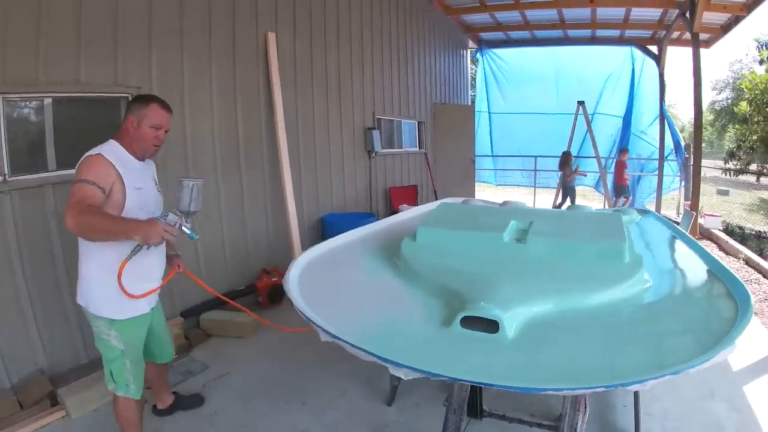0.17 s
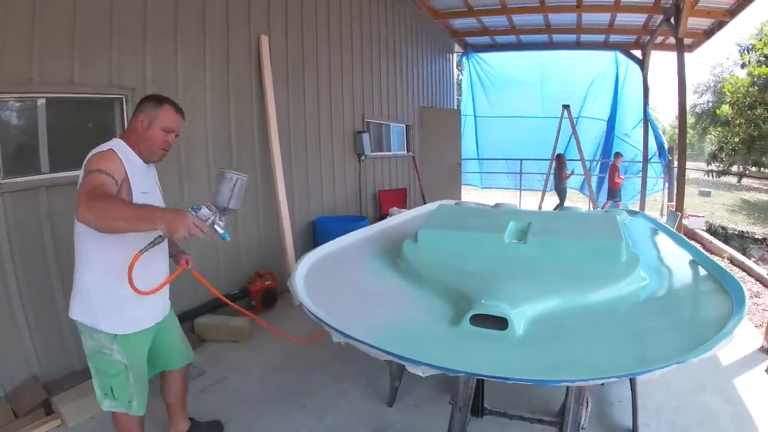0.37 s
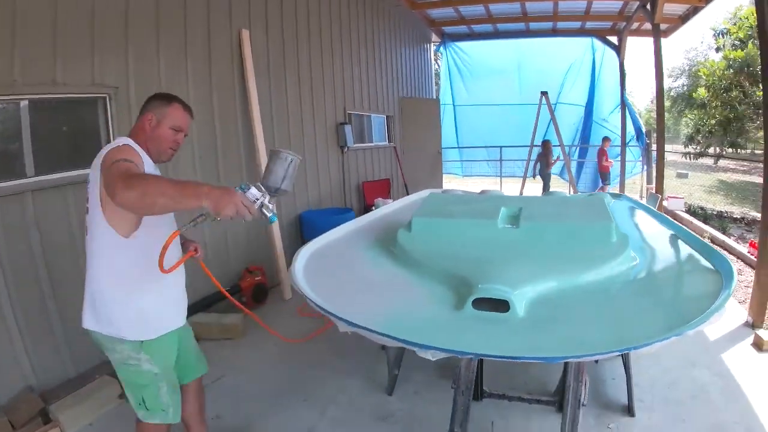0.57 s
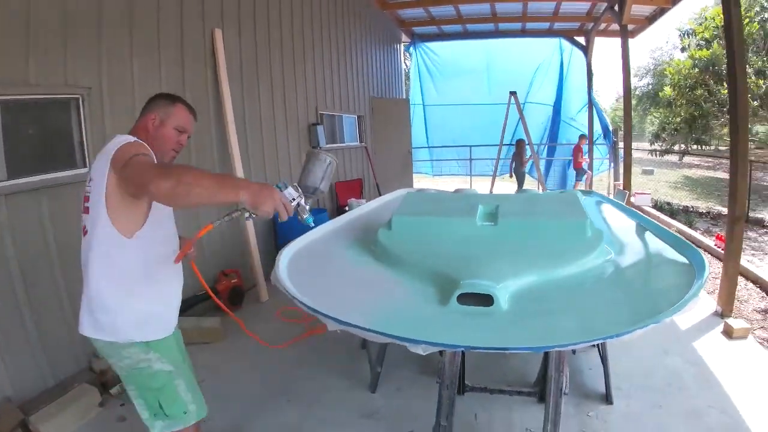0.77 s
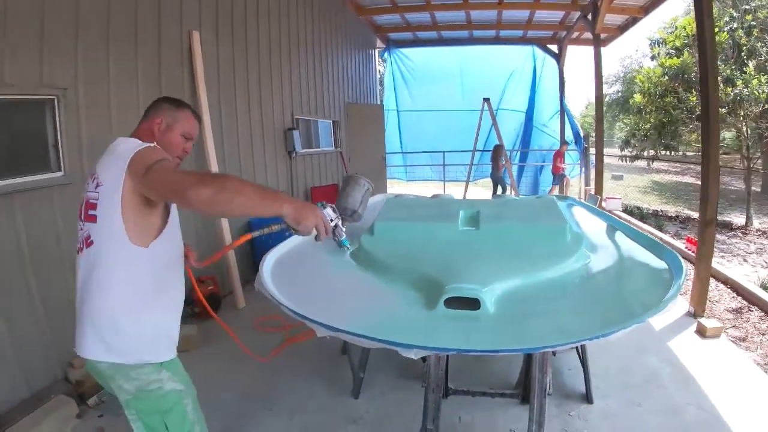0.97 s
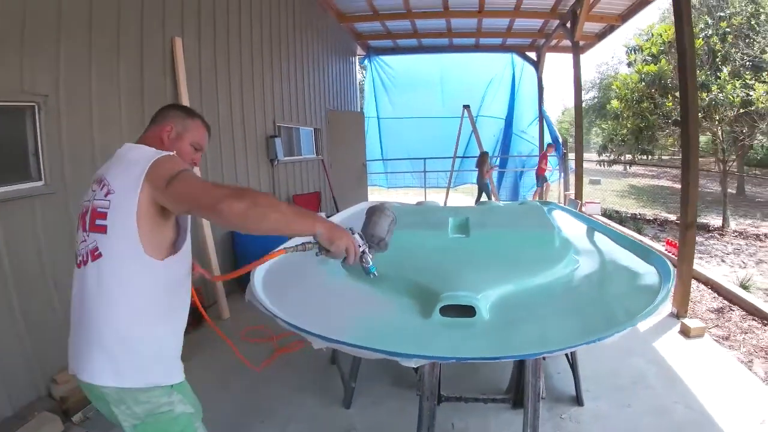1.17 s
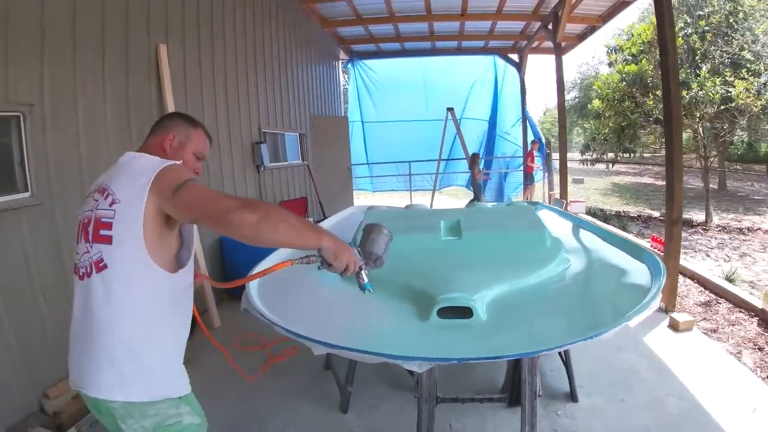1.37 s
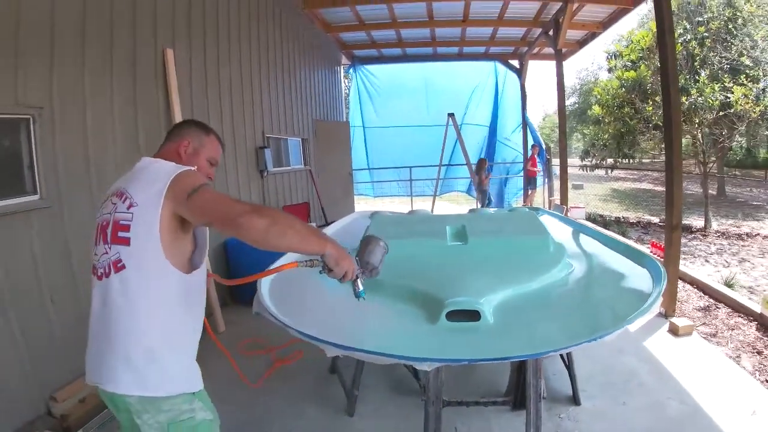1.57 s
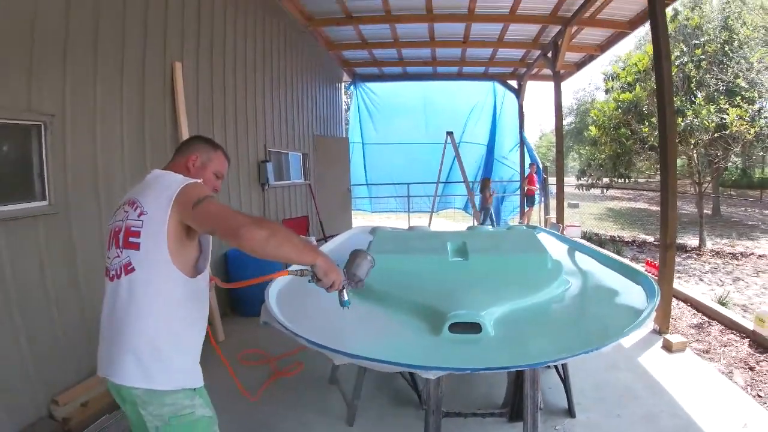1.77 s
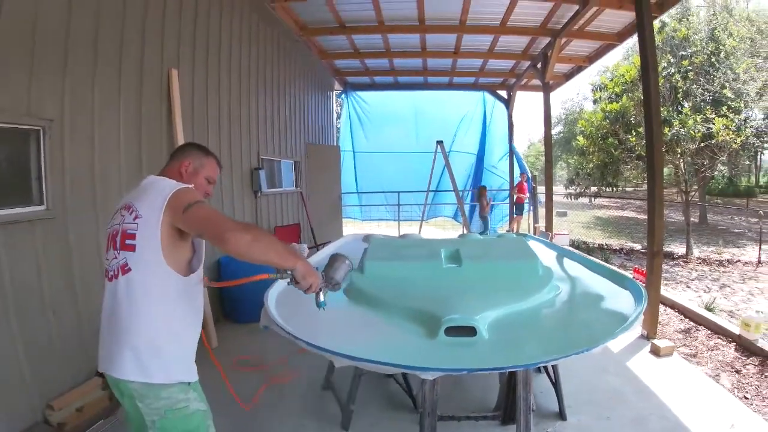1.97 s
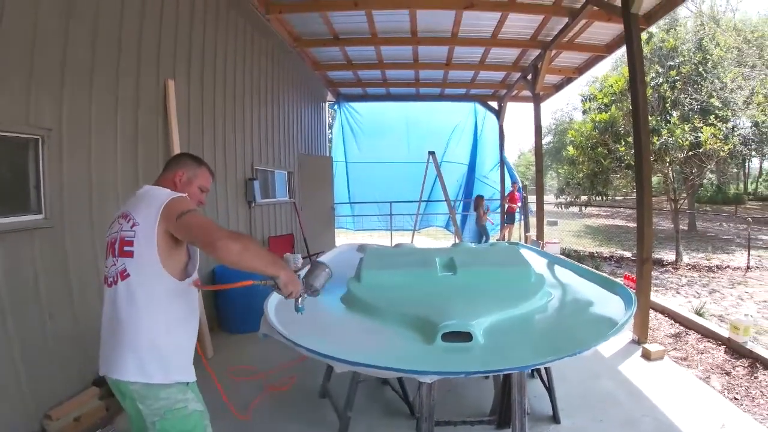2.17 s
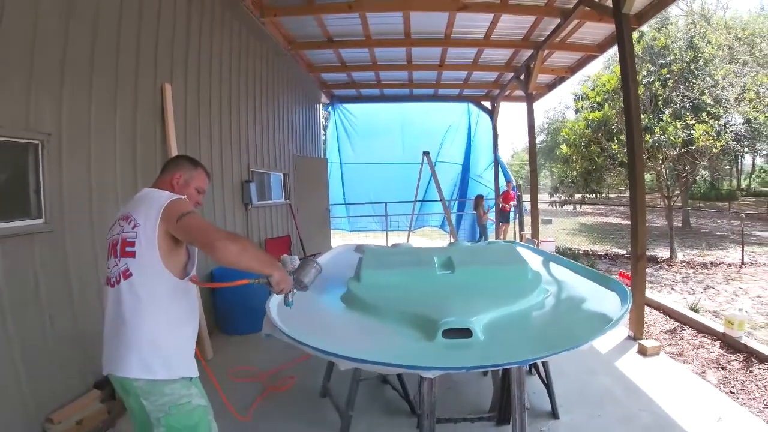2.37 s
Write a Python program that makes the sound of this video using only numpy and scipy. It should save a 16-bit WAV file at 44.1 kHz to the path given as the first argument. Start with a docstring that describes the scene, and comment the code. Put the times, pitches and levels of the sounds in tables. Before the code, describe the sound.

A compressed-air spray gun bursts into a loud steady hiss after scuffing steps and wind buffeting

```python
"""A compressed-air spray gun hisses: jet noise and whistling nozzle bands, strongest while hose pressure is full.
A boat deck and a wall reflect the jet as moving echoes, and the deck drums faintly under it.
Before that a painter shuffles over the gritty concrete of an open carport: scuffs, hose clinks, light taps.
Gusts of low noise buffet the microphone, and the hardest ones make it sputter.
A low outdoor rumble and a faint hiss lie behind."""
import sys
import numpy as np
from scipy import signal
from scipy.fft import rfft, irfft, next_fast_len
from scipy.io import wavfile
from scipy.ndimage import uniform_filter1d, map_coordinates

SR = 44100
rng = np.random.default_rng(int(sys.argv[2]) if len(sys.argv) > 2 else 0)


def file_out(sig):
    """Save sig as 16-bit WAV at sys.argv[1]."""
    # one column per channel
    cols = np.atleast_2d(sig).T
    # limit, then scale
    lim = np.clip(cols, -1, 1)
    pcm = np.round(lim * 32767).astype(np.int16)
    wavfile.write(sys.argv[1], SR, pcm)


N = 106281


def amp(db):
    """Decibels to gain."""
    return 10 ** (np.asarray(db) / 20)


def unit(x):
    """Scale to rms 1."""
    return x / np.sqrt(np.mean(x ** 2) + 1e-20)


def clock():
    """Time of each sample in seconds."""
    return np.arange(N) / SR


def curve(rows):
    """(s, value) points joined by lines."""
    return np.interp(clock(), *np.transpose(rows))


def along(points, hz):
    """(Hz, value) points joined on a log frequency axis."""
    point_hz, value = np.transpose(points)
    return np.interp(np.log(hz + 1), np.log(point_hz + 1), value)


def filtered(x, response):
    """x times a response of frequency, zero-padded."""
    size = next_fast_len(N + SR // 2)
    spectrum = rfft(x, size) * response(np.fft.rfftfreq(size, 1 / SR))
    return irfft(spectrum, size)[..., :N]


def noise(spectrum):
    """Coloured noise of rms 1."""
    return unit(filtered(rng.standard_normal(N), lambda hz: amp(along(spectrum, hz))))


def even(x, size):
    """Level a noise over size samples, so that mainly its envelope sets the strength."""
    power = uniform_filter1d(uniform_filter1d(x ** 2, size), size)
    return unit(x / np.sqrt(np.abs(power) + 0.068))


def whistle(centre_hz, width_hz):
    """A narrow band of air noise, rms 1."""
    band = lambda hz: 1 / (1 + (2 * (hz - centre_hz) / width_hz) ** 2)
    return unit(filtered(rng.standard_normal(N), band))


def wobble(rate_hz):
    """A smooth random curve, rate_hz knots a second."""
    return map_coordinates(rng.standard_normal(N // 10), [clock() * rate_hz], mode="wrap")


def bursts(rows):
    """A rounded swell for each (start s, length s, dB) row."""
    t = clock()
    return sum(amp(db) * np.sin(np.pi * np.clip((t - s) / length_s, 0, 1)) for s, length_s, db in rows)


YARD_DB = -49
# Outdoor rumble spectrum. Each row: frequency in Hz, relative level in dB.
YARD_SPECTRUM = [(40, -5), (180, 0.5), (300, -8), (450, -10), (800, -9), (1100, -19.5), (1600, -22),
                 (4000, -49)]
# Faint hiss spectrum. Each row: frequency in Hz, relative level in dB.
AIR_SPECTRUM = [(200, -20), (700, -7), (1200, -1), (2000, 1), (4000, 1), (6500, -1), (8900, -0.5),
                (9800, -10), (11200, -19.5), (13000, -24), (15600, -36)]
# Hiss level. Each row: time in seconds, level in dB.
AIR_LEVEL = [(0, -52.5), (.22, -52.5), (.45, -51), (.76, -51), (.88, -56), (1.2, -58)]


def background():
    """A steady low outdoor rumble under a faint hiss that sinks before the spray starts."""
    return amp(YARD_DB) * noise(YARD_SPECTRUM) + amp(curve(AIR_LEVEL)) * noise(AIR_SPECTRUM)


# Gust strength. Each row: time in seconds, level in dB.
GUST_LEVEL = [(0.0, -43.5), (0.05, -62), (0.11, -37.5), (0.17, -49.5), (0.33, -32.5), (0.35, -42),
              (0.42, -30), (0.55, -35.5), (0.6, -26), (0.75, -45), (0.78, -31.5), (0.82, -40.5),
              (1.01, -23.5), (1.29, -47.5), (1.72, -49), (1.97, -23.5), (1.99, -44), (2.03, -22.5),
              (2.07, -41), (2.11, -22.5), (2.24, -24.5), (2.28, -15), (2.32, -21.5), (2.41, -39)]
# Gust spectrum. Each row: frequency in Hz, relative level in dB.
RUMBLE_SPECTRUM = [(10, -10), (25, 2), (48, 0.5), (80, -7.5), (125, -13), (190, -27.5), (350, -49),
                   (800, -72), (2000, -100)]
# Eddies that thump the microphone. Each row: start in seconds, length in seconds, level in dB.
THUMPS = [(.405, 0.028, -27.5), (.57, 0.065, -28.5), (.955, 0.014, -30.5), (.985, 0.053, -32.5),
          (2.18, 0.034, -22.5), (2.245, 0.064, -18.5), (2.3, 0.04, -28)]
# Thump spectrum. Each row: frequency in Hz, relative level in dB.
THUMP_SPECTRUM = [(30, -1.5), (90, 0.5), (170, 1.5), (240, -14), (350, -29), (500, -24), (1200, -55),
                  (3000, -100)]
# Sputters in the hardest eddies. Each row: start in seconds, length in seconds, level in dB.
SPUTTERS = [(2.004, 0.0073, -25.5), (2.182, 0.0049, -20), (2.192, 0.02, -23), (2.213, 0.015, -27),
            (2.243, 0.019, -24.5), (2.258, 0.018, -16), (2.281, 0.015, -21), (2.29, .07, -36.5)]
# Sputter spectrum. Each row: frequency in Hz, relative level in dB.
SPUTTER_SPECTRUM = [(80, -7.5), (200, 4.5), (310, 7), (520, -3.5), (850, -2.5), (1150, -3.5), (1430, 0.5),
                    (1620, -16), (3000, -50)]


def wind():
    """Gusts rumble on the microphone as levelled low noise; single eddies thump and sputter."""
    rumble = amp(curve(GUST_LEVEL)) * even(noise(RUMBLE_SPECTRUM), size=1400)
    thumps = bursts(THUMPS) * even(noise(THUMP_SPECTRUM), size=500)
    sputters = bursts(SPUTTERS) * even(noise(SPUTTER_SPECTRUM), size=150)
    return rumble + thumps + sputters


KNOCK_HZ, KNOCK_T60_S = 140, 0.015
# Short dull pops on the microphone. Each row: start in seconds, level in dB.
KNOCKS = [(.417, -18.5), (0.778, -15.5), (2.008, -19)]


def knocks():
    """Each pop is one heavily damped low swing."""
    out = np.zeros(N)
    for s, db in KNOCKS:
        age = np.maximum(clock() - s, 0)
        out += amp(db - 60 * age / KNOCK_T60_S) * np.sin(2 * np.pi * KNOCK_HZ * age)
    return out


WET_DB = -7
# Reverberation of the carport. Each row: frequency in Hz, t60 in seconds.
CARPORT_T60 = [(200, 0.74), (3000, 0.3), (12000, 0.46)]


def carport(x):
    """A short tail from wall, floor and roof: noise decaying at its own rate in each band."""
    hz, t, bands = signal.stft(rng.standard_normal(SR // 2), SR, nperseg=256)
    decay = amp(-60 * t / along(CARPORT_T60, hz)[:, None])
    tail = signal.istft(bands * decay, SR, nperseg=256)[1]
    delayed = np.pad(tail / np.linalg.norm(tail), (SR // 200, 0))  # 5 ms
    return signal.fftconvolve(x, delayed)[:N]


TAP_T60_S = 0.078
# Light hollow taps. Each row: start in seconds, level in dB.
TAPS = [(0.729, -45.5), (.738, -47), (1.068, -40.5), (1.081, -50)]
# Tap spectrum. Each row: frequency in Hz, relative level in dB.
TAP_SPECTRUM = [(300, -25), (800, -6.5), (1100, -0.5), (1450, 0), (1900, -7), (3000, -17), (9000, -44)]


def taps():
    """Soft hollow contacts: coloured noise that dies at once."""
    t = clock()
    envelope = sum((t > s) * amp(db - 60 * np.maximum(t - s, 0) / TAP_T60_S) for s, db in TAPS)
    return noise(TAP_SPECTRUM) * envelope


CLINK_ATTACK_S = 0.00058
# Hose fitting clinks. Each row: start in seconds, level in dB, share of the free ring time.
CLINKS = [(.555, -31, 0.19), (.977, -33.5, 0.98)]
# Modes of the fitting. Each row: frequency in Hz, relative level in dB, free t60 in seconds.
FITTING_MODES = [(3285, -7, 0.35), (3480, -5.5, 0.14), (3630, 5, .05), (4300, -4, .12), (7600, -14, 0.21)]


def fitting():
    """The metal hose fitting clinks as the gun is lifted: decaying modes, damped or ringing free."""
    out = np.zeros(N)
    for s, db, free_share in CLINKS:
        age = np.maximum(clock() - s, 0)
        ring = np.zeros(N)
        for hz, mode_db, t60_s in FITTING_MODES:
            phase = 2 * np.pi * hz * age + wobble(200)  # jitter roughens the tone
            ring += amp(mode_db - 60 * age / (free_share * t60_s)) * np.sin(phase)
        out += amp(db) * ring * (1 - np.exp(-age / CLINK_ATTACK_S))
    return out


GRIT_PER_S, GRIT_SHARE = 2200, 0.38  # mean rate of cracks; their share of the power
# Shoe scuffs. Each row: start in seconds, rise in seconds, hold in seconds,
# decay to -60 dB in seconds, level in dB, tilt in dB per octave (above 900 Hz).
SCUFFS = [(0.025, 0.013, 0.0089, 0.42, -42, 4), (0.319, .002, .002, 0.44, -47, -1.5),
          (0.332, .02, 0.075, 0.3, -50, -3), (0.352, 0.0027, 0.026, 0.1, -38, -5.5),
          (0.5564, .001, .003, 0.12, -39, -1), (0.574, 0.0054, 0.0085, 0.16, -38, .5),
          (0.601, 0.036, 0.096, 0.06, -47.5, 0), (.969, 0.0025, 0.015, .12, -33.5, 2),
          (1.005, 0.0033, 0.0041, 0.23, -40.5, -3.5)]
# Sole spectrum before tilt. Each row: frequency in Hz, relative level in dB.
SOLE_SPECTRUM = [(200, -14), (700, -2.5), (1800, -2), (3400, 1.5), (5000, -1.5), (7800, -5.5),
                 (9000, -12.5), (9900, -21), (11300, -30), (13500, -37), (15600, -42)]


def shoes():
    """Each scuff drags a sole over grit: rubbing noise and tiny cracks."""
    out = np.zeros(N)
    for s, rise_s, hold_s, decay_s, db, tilt_db in SCUFFS:
        age = clock() - s
        decay = amp(-60 * np.maximum(age - rise_s - hold_s, 0) / decay_s)
        envelope = np.clip(age / rise_s, 0, 1) * decay
        grit = unit((rng.random(N) < GRIT_PER_S / SR) * rng.standard_normal(N))
        rub = np.sqrt(GRIT_SHARE) * grit + np.sqrt(1 - GRIT_SHARE) * rng.standard_normal(N)
        colour = lambda hz: amp(along(SOLE_SPECTRUM, hz) + tilt_db * np.log2(np.maximum(hz, 900)))
        out += amp(db) * envelope * unit(filtered(rub, colour))
    return out


TRIGGER_S = 1.248
LEAK_S, LEAK_DB, LEAK_HZ, LEAK_WIDTH_HZ = 1.185, -60, 5960, 450


def leak():
    """A thread of air whistles thinly as the trigger takes up its slack, before the valve opens."""
    return bursts([(LEAK_S, TRIGGER_S - LEAK_S, LEAK_DB)]) * whistle(LEAK_HZ, LEAK_WIDTH_HZ)


OPEN_S, SHUT_DB = 0.019, -41  # the valve opens from a leak to full flow
SURGE_DB, SURGE_S = 1, 0.1  # extra pressure stored in the hose, and its decay
TURN_DB, TURN_S, TURN_HZ = 3, 0.19, 7000  # extra treble until the nozzle has turned down
SOUND_M_PER_S = 343
WALL_M, WALL_M_PER_S, WALL_ECHO = 2.6, 0.035, 0.19  # detour at trigger, its growth, echo gain
DECK_ECHO = 0.096  # gain
DRUM_DB, DRUM_RISE_S = -36.5, 0.3
# Air flow before surge and flutter. Each row: time in seconds, level in dB.
JET_LEVEL = [(1.27, -21.5), (1.56, -22), (1.8, -22.5), (2.05, -23), (2.25, -23), (2.33, -25), (2.41, -28.5)]
# Jet spectrum. Each row: frequency in Hz, relative level in dB.
HISS_SPECTRUM = [(150, -30), (400, -18.5), (600, -16), (950, -14), (1500, -10), (2250, -6), (2600, -6),
                 (3200, -2), (3900, -1.5), (4500, -2.5), (5400, 0), (6400, -1.8), (7600, 0.5), (8900, -2),
                 (9600, -5), (10700, -9), (11300, -14.5), (12500, -16), (14000, -20), (15600, -26)]
# Whistling nozzle bands. Each row: centre in Hz, width in Hz, level in dB relative to the hiss.
NOZZLE_BANDS = [(2580, 280, -17.5), (3140, 260, -18.5), (5350, 370, -25), (8700, 660, -12.5)]
# Detour of the sound off the deck. Each row: time in seconds, extra path in metres.
DECK_DETOUR = [(1.25, 0.93), (1.55, .62), (1.8, 0.507), (2.41, 0.438)]
# Jet drumming on the deck. Each row: frequency in Hz, relative level in dB.
DRUM_SPECTRUM = [(40, -18), (110, -24), (160, 0.5), (195, -2.5), (250, -9.5), (340, -11), (500, -13),
                 (800, -18), (1400, -17.5), (2500, -46)]


def spray():
    """Jet noise with narrow nozzle bands, combed by moving echoes off wall and deck; it also drums on the deck."""
    t = clock()
    age = np.maximum(t - TRIGGER_S, 0)
    valve = (age > 0) * amp(SHUT_DB * (1 - np.minimum(age / OPEN_S, 1)))

    nozzle = sum(amp(db) * whistle(centre_hz, width_hz) for centre_hz, width_hz, db in NOZZLE_BANDS)
    jet = noise(HISS_SPECTRUM) + nozzle
    echo = lambda metres: map_coordinates(jet, [(t - metres / SOUND_M_PER_S) * SR], order=5)
    deck = DECK_ECHO * echo(curve(DECK_DETOUR))
    wall = WALL_ECHO * echo(WALL_M + WALL_M_PER_S * age)
    heard = unit(jet + deck + wall)

    treble = filtered(heard, lambda hz: 1 - np.exp(-(hz / TURN_HZ) ** 2))
    heard = heard + (amp(TURN_DB * np.exp(-age / TURN_S)) - 1) * treble

    flutter_db = 0.21 * wobble(25.1) + 0.32 * wobble(200)
    flow_db = curve(JET_LEVEL) + SURGE_DB * np.exp(-age / SURGE_S) + flutter_db
    drum = amp(DRUM_DB) * (1 - np.exp(-age / DRUM_RISE_S)) * noise(DRUM_SPECTRUM)
    return valve * (amp(flow_db) * heard + drum)


def scene():
    """The spray, the painter's movements in the carport, wind and the outdoor background."""
    moves = shoes() + fitting() + taps()
    painter = moves + amp(WET_DB) * carport(moves)
    mono = background() + wind() + knocks() + painter + leak() + spray()
    return np.array([mono, mono])


TOP_HZ = 15720
# Stereo width, in the top treble only. Each row: frequency in Hz, side level in dB.
SIDE_SPECTRUM = [(9500, -68.5), (10800, -48), (11600, -12), (13500, 3), (15600, -8)]


def record(dry):
    """Mono but for a smeared side signal in the top treble, with nothing above the band limit."""
    smear = rng.standard_normal(SR // 200)  # 5 ms
    smeared = signal.fftconvolve(dry[0], smear / np.linalg.norm(smear))[:N]
    side = filtered(smeared, lambda hz: amp(along(SIDE_SPECTRUM, hz)))
    return filtered(dry + np.array([side, -side]), lambda hz: hz < TOP_HZ)


dry = scene()
out = record(dry)
file_out(out)
```